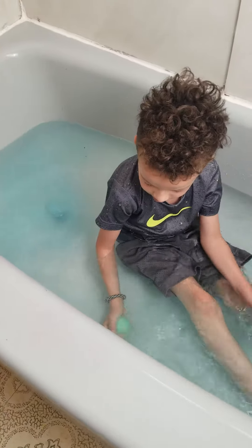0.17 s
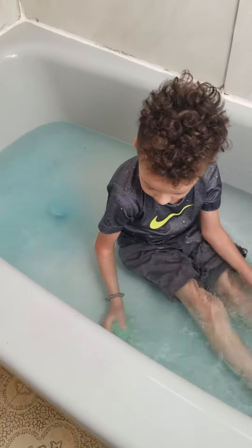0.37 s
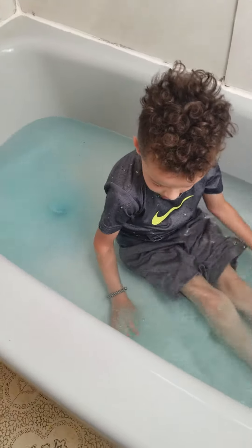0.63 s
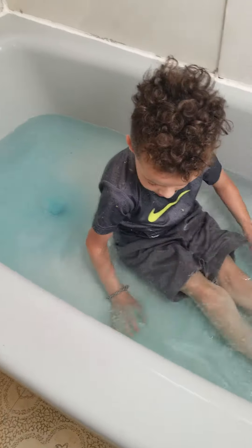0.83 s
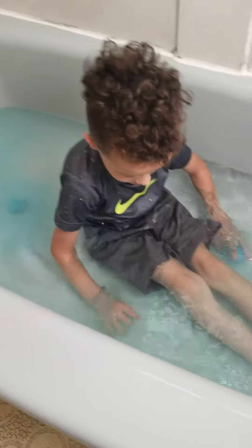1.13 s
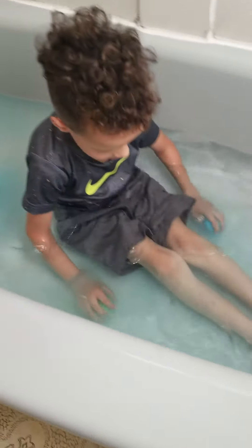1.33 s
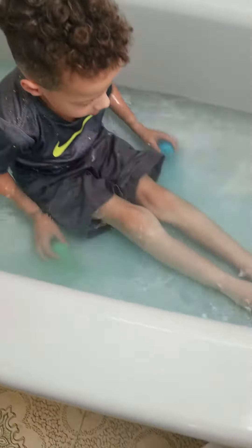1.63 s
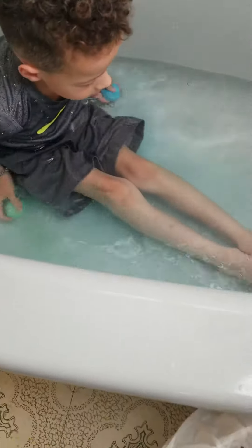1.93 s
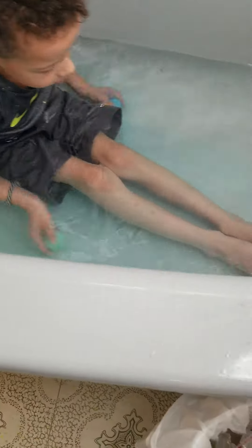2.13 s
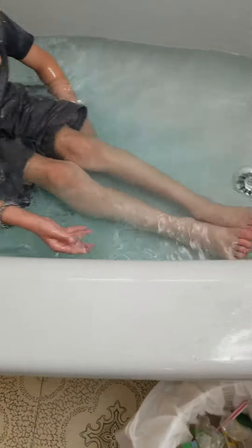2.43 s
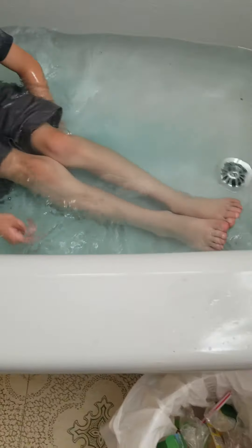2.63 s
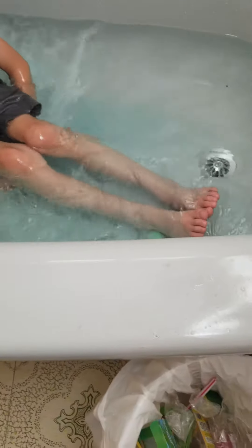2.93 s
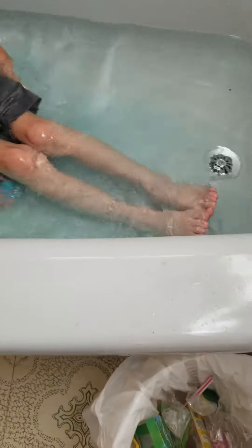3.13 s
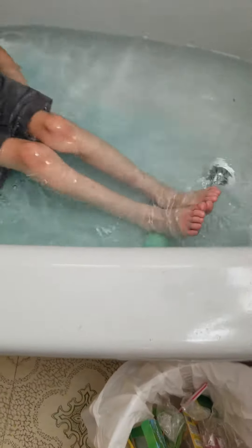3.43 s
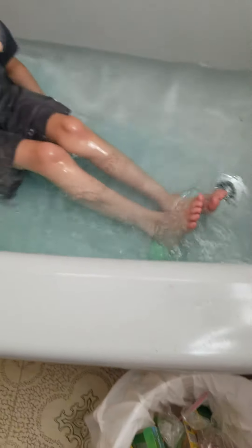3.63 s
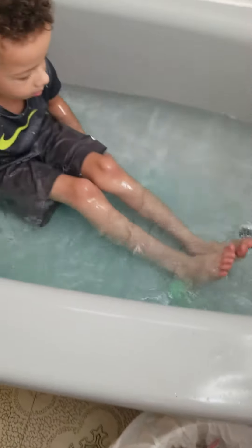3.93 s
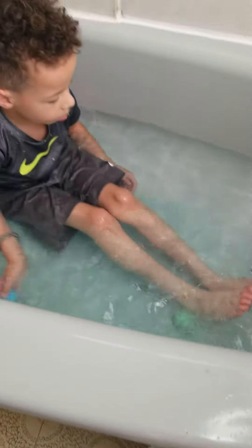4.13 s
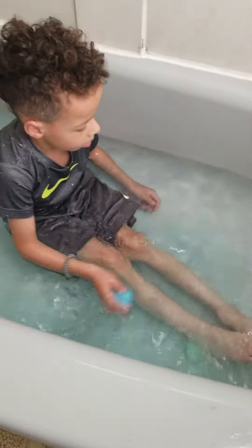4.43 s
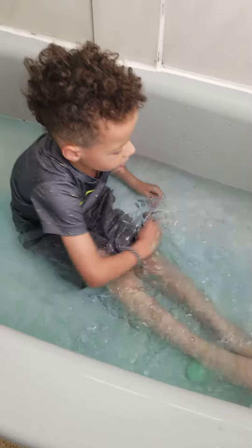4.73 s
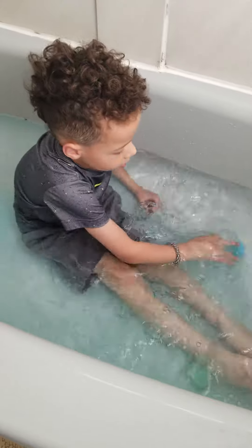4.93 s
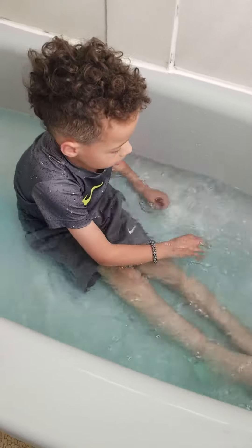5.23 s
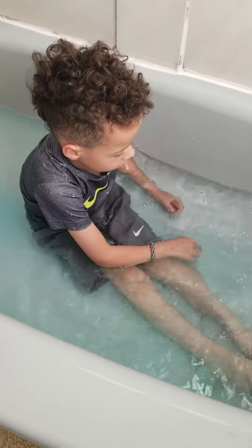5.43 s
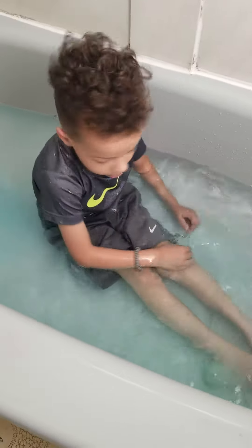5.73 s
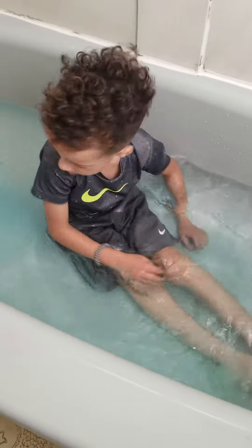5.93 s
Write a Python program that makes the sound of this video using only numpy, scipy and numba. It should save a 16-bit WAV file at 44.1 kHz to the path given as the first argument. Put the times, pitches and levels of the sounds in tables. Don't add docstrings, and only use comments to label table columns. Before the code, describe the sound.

Quiet drips and soft swirls in a shallow bath, two small slap flurries, then a harder burst of splashing that settles into last drops.

```python
import sys
import numpy as np
from scipy import signal
from scipy.fft import rfft, irfft, next_fast_len
from scipy.io import wavfile
from scipy.ndimage import uniform_filter1d
from numba import njit

SR = 44100
rng = np.random.default_rng(int(sys.argv[2]) if len(sys.argv) > 2 else 0)


def materialize(psi):
    bounded = np.clip(np.atleast_2d(psi).T, -1, 1)
    quanta = np.round(bounded * 32767).astype(np.int16)
    wavfile.write(sys.argv[1], SR, quanta)


def ratio_of_db(decibels):
    return 10 ** (np.asarray(decibels, float) / 20)


N = 268657
CENTRED_FROM_S = 5.5


def shaped(x, points):
    hz, db = np.transpose(points)
    size = next_fast_len(x.shape[-1])
    f = np.maximum(np.arange(size // 2 + 1) * SR / size, 1)
    gain = ratio_of_db(np.interp(np.log(f), np.log(hz), db))
    return irfft(rfft(x, size) * gain, size)[..., :x.shape[-1]]


def band(x, hz, width_hz):
    return signal.lfilter(*signal.iirpeak(hz, hz / width_hz, SR), x)


def unit(x):
    return x / np.sqrt(np.mean(x ** 2))


def walk(rate_hz):
    hold = int(SR / rate_hz)
    levels = np.repeat(rng.standard_normal(N // hold + 1), hold)
    return uniform_filter1d(uniform_filter1d(levels, hold), hold)[:N]


def spread(x, pan_db):
    return x * ratio_of_db(np.array([[.5], [-.5]]) * pan_db)


def diffuse(length):
    # (frequency [Hz], likeness [0-1])
    likeness = [(60, 0.82), (130, 0.94), (290, 0.81), (640, 0.94), (1410, 0.0076), (3100, 0.0054),
                (6820, 0.0076), (15000, 0.032)]
    hz, like = np.transpose(likeness)
    mid_db, side_db = (10 * np.log10((1 + sign * like) / 2) for sign in (1, -1))
    mid = shaped(rng.standard_normal(length), np.c_[hz, mid_db])
    side = shaped(rng.standard_normal(length), np.c_[hz, side_db])
    return np.array([mid + side, mid - side])


@njit
def bubbles(start, hz, size, cycles, rise, count, swell=0.):
    out = np.zeros(count)
    for k in range(len(start)):
        n = int(3 * cycles[k] * SR / hz[k])
        fall = 1e-3 ** (1 / n)
        glide = 2 ** (rise[k] * hz[k] / (cycles[k] * SR))
        step = 2 * np.pi * hz[k] / SR * 2 ** (-rise[k] / 4)
        phase, a = 0., size[k]
        swell_rad = 6 * max(swell * cycles[k], 1.)
        for i in range(start[k], min(start[k] + n, count)):
            out[i] += a * np.sin(phase) * min(phase / swell_rad, 1.)
            phase += step
            step = min(step * glide, 3.)
            a *= fall
    return out


def lone_bubbles():
    # (time [s], peak level [dB], pitch [Hz], ring
    bubble_rings = [(0.733, -34.5, 860, 4.5), (0.739, -37, 916, 8), (0.799, -42, 690, 8.2), (0.87, -35.5, 433, 3),
                    (0.872, -33, 944, 5.6), (0.9093, -50, 1030, 9), (0.967, -40.5, 512, 16),
                    (0.983, -40, 553, 5.6), (1.02, -45.5, 596, 11), (0.895, -37.5, 630, 4.1),
                    (1.06, -54, 610, 7.5), (1.028, -46.5, 222, 6.6), (2.239, -41, 243, 11), (2.2628, -47, 870, 14),
                    (2.379, -51, 226, 6.7), (4.267, -35.5, 763, 12), (4.279, -32.5, 744, 23),
                    (4.289, -34.5, 1040, 11), (4.369, -39, 721, 28), (4.603, -34.5, 694, 9),
                    (4.642, -34.5, 482, 3), (4.717, -32.5, 563, 6), (4.746, -36, 458, 10),
                    (4.7477, -25, 1030, 2.7), (4.779, -32, 275, 5.1), (4.819, -27.5, 805, 6),
                    (4.8236, -36, 1080, 4.8), (4.89, -33.5, 352, 8.6), (4.891, -26.5, 860, 9),
                    (4.93, -40, 382, 16), (4.97, -37.5, 520, 6.6), (5.829, -36, 433, 2.3), (2.818, -53.5, 940, 32),
                    (0.868, -35.5, 1530, 6), (0.868, -39.5, 2160, 6.8), (0.33, -60, 1940, 22),
             (0.35, -53, 2600, 18), (0.372, -53, 2500, 22), (0.385, -55, 2210, 12), (0.445, -56, 2100, 41),
             (0.972, -46, 1600, 11), (4.35, -40, 1600, 12), (4.465, -31, 1640, 12), (4.558, -35, 1900, 8.2),
             (5.994, -49, 1365, 10), (2.184, -39.5, 2450, 7.5), (2.228, -32.5, 2310, 7.8),
             (2.311, -32.5, 1239, 29), (2.332, -39, 1920, 9.2), (2.5015, -33.5, 2350, 13),
             (2.585, -36, 2200, 8.7), (2.61, -51, 1830, 13), (4.2008, -46, 1740, 18),
             (0.812, -50, 1230, 22), (0.967, -41.5, 760, 5), (2.279, -44, 2570, 12), (4.76, -33, 1540, 8),
             (4.666, -33, 1500, 10), (2.765, -45.5, 1270, 18), (4.2263, -48, 1790, 4.3),
             (4.4536, -28, 1150, 3.5), (5.149, -47, 2350, 6.2), (4.254, -27.5, 2080, 4.2),
             (4.2878, -30.5, 1633, 35), (4.352, -37, 1347, 29), (4.42, -30, 1110, 7.9),
             (4.5006, -19.5, 1950, 12), (4.659, -30, 1750, 7), (4.699, -26, 1570, 8.3),
             (4.744, -21, 2750, 4), (4.794, -25.5, 1440, 7.7), (4.8465, -26, 2370, 23),
             (4.9408, -24.5, 2240, 8.6), (5.0485, -35.5, 2600, 5.1), (5.555, -39, 2300, 6.2),
             (5.8317, -17.5, 2144, 2.2), (5.928, -42.5, 2010, 18), (6.0612, -42.5, 2600, 16),
                    (0.003, -49, 3930, 34), (3.096, -48, 4370, 25), (0.965, -40, 6370, 9), (2.165, -47, 3230, 11),
             (2.226, -33.5, 4630, 5.4), (2.287, -23.5, 5980, 12), (2.4195, -34.5, 7360, 16),
             (2.467, -33, 3000, 5.7), (2.4931, -31.5, 3800, 10.5), (2.519, -49, 3600, 14),
             (2.55, -44, 3720, 13), (3.47, -47.5, 4180, 15), (4.17, -49, 5600, 8.9), (4.458, -32, 3300, 14),
             (4.477, -25.5, 3870, 10), (4.538, -30, 4100, 17), (2.226, -46, 1330, 3.1),
             (0.867, -51, 3480, 5), (4.243, -37, 3100, 16), (2.18, -49, 6200, 14), (4.575, -35, 5200, 11),
             (5.53, -46, 5250, 15), (4.289, -28.5, 2980, 6.2), (4.354, -41, 2530, 7),
             (4.421, -29.5, 4800, 7.5), (4.5972, -28, 3680, 19), (4.7047, -20.5, 3440, 5.3),
             (4.745, -23, 3950, 14), (4.802, -28.5, 5320, 13), (4.836, -26.5, 3320, 6.4),
             (4.96, -26.5, 4840, 4.5), (5.1377, -32.5, 2780, 6.3), (5.8553, -37, 3120, 17)]
    # (time [s], peak level [dB], pitch [Hz], ring [cycles], glide [octaves])
    sliders = [(0.0024, -44.5, 3330, 24, -0.073), (0.046, -50, 3270, 18, -0.079),
               (0.0953, -45, 3140, 34, -0.19), (0.152, -41.5, 3010, 17, -0.23),
               (0.883, -37, 163.4, 7, 0.21), (1.018, -59, 560, 4.5, .05), (0.964, -46.5, 2360, 17, 0.037),
               (2.248, -37, 705, 4.2, 0.095), (2.338, -40.5, 1277, 21, -0.1),
               (3.044, -59, 3560, 16, -0.034), (3.045, -45, 4430, 13, 0.063),
               (3.056, -45, 3535, 39, -0.059), (3.13, -45, 2750, 7.8, 0.025),
               (4.604, -28, 1670, 19, -0.0092), (4.643, -48, 620, 4, .1), (4.876, -37, 499, 22, 0.15),
               (5.855, -50, 2020, 16, -0.0071), (2.69, -31.5, 1360, 17, -0.092),
               (2.725, -45, 1280, 20, -0.03), (2.702, -40, 1534, 13, 0.1), (3.043, -40, 3720, 17, -0.27),
               (3.124, -50, 2435, 49, -0.091), (4.431, -26, 1563, 18, 0.0055), (4.45, -32, 2920, 9, 0.28),
               (4.463, -20, 1740, 2.7, 0.24), (4.473, -25.5, 2690, 19, 0.35),
               (4.516, -20.5, 2770, 3.1, -0.049), (4.532, -25, 2270, 7.6, 0.16),
               (4.486, -33, 3120, 24, 0.12), (4.554, -27, 2130, 3, 0.2), (4.627, -20, 1730, 9.2, 0.29),
               (4.6365, -19, 1980, 4.2, 0.39), (4.695, -30, 4270, 12, 0.06), (4.709, -32.5, 610, 6.4, 0.27),
               (4.735, -32, 4160, 9.4, 0.038), (4.757, -30, 2530, 7.7, -0.00044),
               (4.772, -34, 1000, 9.3, 0.04), (4.922, -43, 2350, 5.5, 0.02), (5.811, -41, 2890, 24, -.4)]
    rise_octaves = 0.033
    pinch_share = 0.14
    neck_db, neck_octaves, neck_cycles = -15, 0.573, 8.55
    neck_db_per_doubling = 2.5
    pan_1khz_db, pan_db_per_octave, centred_pan_db = 4.5, 1.7, -1.5
    centred_lead = 10

    steady = [(*row, rise_octaves) for row in bubble_rings]
    s, db, hz, cycles, rise = np.transpose([*steady, *sliders]).astype(float)
    centred = s > CENTRED_FROM_S
    pan_db = pan_1khz_db + pan_db_per_octave * np.log2(hz / 1000) + centred_pan_db * centred
    starts = (s * SR).astype(int) - np.outer([0, centred_lead], centred)
    neck_hz = hz * 2 ** (neck_octaves / 4)
    neck_gain = ratio_of_db(neck_db - neck_db_per_doubling * np.log2(cycles / 8))
    same = np.ones(len(s))
    ports = []
    for start, size in zip(starts, spread(ratio_of_db(db - 6.0), pan_db)):
        ring = bubbles(start, hz.copy(), size, np.maximum(cycles, 1.), rise.copy(), N, pinch_share)
        neck = bubbles(start, neck_hz, size * neck_gain, neck_cycles * same, neck_octaves * same,
                       N, pinch_share)
        ports.append(ring + neck)
    return np.array(ports)


def spray():
    # (time [s], heavy drop peak [dB], heavy drop pitch [Hz], mist peak [dB])
    slaps = [(0.7302, -29.5, 2380, -67), (0.798, -32.5, 2020, -61), (0.867, -28, 2170, -64),
             (0.882, -31, 2780, -76), (0.96, -36.5, 2450, -72), (0.9947, -35.5, 1420, -76),
             (2.2258, -28.5, 2240, -52.5), (2.2464, -38, 5150, -64), (2.2865, -28.5, 6100, -55),
             (2.4694, -54, 3220, -53.5), (2.4914, -44, 3830, -61), (2.583, -88, 2080, -59.5),
             (4.241, -27.5, 3260, -61), (4.2868, -23.5, 3100, -52.5), (4.332, -25, 3080, -48),
             (4.356, -17.5, 2520, -51), (4.4231, -43, 4540, -42.5), (4.4732, -17, 3700, -46),
             (4.5198, -23, 2260, -49.5), (4.594, -28, 3620, -40.5), (4.6917, -17, 1860, -62),
             (4.744, -15, 3700, -50), (4.811, -33, 4900, -43), (4.835, -21.5, 2440, -60),
             (4.933, -42, 2220, -53), (4.9613, -24, 4830, -50), (5.1393, -46, 2880, -60),
             (5.548, -58, 5000, -53), (5.554, -48, 4500, -51.5), (5.811, -33, 2800, -57),
             (5.8305, -36, 2580, -46)]
    trickles = [(0.0024, -34, 4800, -56), (0.02, -44.5, 4620, -66), (0.2783, -48.5, 2430, -72),
                (0.3054, -45.5, 2000, -71), (0.325, -46.5, 2310, -77), (0.347, -52, 2340, -70),
                (0.371, -48, 2200, -67), (0.444, -47, 2270, -65), (0.999, -58, 1800, -60.5),
                (0.679, -51.5, 2050, -65), (1.3194, -52, 5100, -84), (1.605, -49, 5200, -75),
                (1.653, -50, 5700, -81), (1.9622, -49, 5200, -72), (1.986, -51.5, 5000, -72),
                (2.18, -43, 5600, -64), (2.204, -60, 2510, -56), (2.423, -56, 2080, -54),
                (2.6917, -45, 2200, -65.5), (3.041, -45.5, 4520, -73), (3.052, -40, 5850, -74),
                (4.002, -71, 2480, -66), (4.026, -68, 4660, -61.5), (4.083, -67, 6300, -59.5),
                (4.105, -70, 6300, -59), (4.205, -42, 1690, -59), (5.2106, -41, 5200, -56),
                (5.2976, -76, 5180, -60), (5.5114, -74, 5750, -67), (5.7456, -45, 1750, -59.5),
                (5.8604, -50, 2570, -62), (5.8885, -59.5, 1840, -68), (5.9997, -51, 1500, -55.5),
                (6.026, -67, 3070, -57.5)]
    # (frequency [Hz], level [dB])
    slap_mist = [(5000, -2), (7000, 6), (10500, 9), (13000, 1), (15800, -16)]
    # (frequency [Hz], level [dB])
    fine_mist = [(5000, -7.5), (8500, 5), (11000, 3.5), (13000, 4.5), (15800, -10)]
    spray_s, mist_rise_s = .015, 0.0035
    slap_octaves, trickle_octaves = 1.99, 0.73
    trickle_ring_cycles = 5.3

    s, heavy_db, heavy_hz, mist_db = np.transpose([*slaps, *trickles])
    trickling = np.arange(len(s)) >= len(slaps)
    octaves = np.where(trickling, trickle_octaves, slap_octaves)
    mist = np.zeros((2, 2, N + SR))
    t = np.arange(SR // 14) / SR
    envelope = np.exp(-t / spray_s) * np.minimum(t / mist_rise_s, 1)
    for k, (start, db) in enumerate(zip((s * SR).astype(int), mist_db)):
        noise, crackle = rng.standard_normal((2, 2, len(t)))
        mist[int(trickling[k]), :, start:start + len(t)] += ratio_of_db(db + 0.5 + 1.9 * crackle) * envelope * noise
    late, size = rng.random((2, 24, len(s)))
    when = s + 2.5 * spray_s * late ** 6
    pitch = np.linspace(-.45, .55, len(late))[:, None]
    hz = np.clip(heavy_hz * 2 ** (octaves * pitch), 300, 9000).ravel()
    loud = ratio_of_db(heavy_db - 14.0 - 4.6 * size - 10.0 * late)
    cycles = 1.85 + 4 * late + trickle_ring_cycles * trickling
    heavy = bubbles((when * SR).astype(int).ravel(), hz, loud.ravel(), cycles.ravel(), 0.043 + 0 * hz, N)
    fine = shaped(mist[0, :, :N], slap_mist) + shaped(mist[1, :, :N], fine_mist)
    return spread(fine, 0.22) + spread(heavy, 3.9)


def cracks():
    # (time [s], peak level [dB], left minus right [dB])
    strikes = [(0.967, -57, 3), (2.229, -40, 11), (2.466, -41, 11), (2.4914, -37.5, -5), (3.04, -48, 6.5),
               (4.242, -40, 4.0), (4.2873, -33, 1.0), (4.421, -32, 9), (4.4714, -25, 2), (4.596, -25, 8.5),
               (4.706, -29.5, 1), (4.744, -32, 6), (4.8383, -25.5, 2.5), (4.9595, -28, 3),
               (5.1377, -41.5, 7), (5.5542, -31.5, 0), (5.831, -28.5, 0)]
    crack_s, crack_db = 0.00074, -5
    out = np.zeros((2, N + SR))
    t = np.arange(SR // 100) / SR
    for s, db, pan_db in strikes:
        start = int(s * SR)
        burst = rng.standard_normal(len(t)) * np.exp(-t / crack_s)
        out[:, start:start + len(t)] += spread(burst * ratio_of_db(db + crack_db), pan_db)
    return shaped(out[:, :N], [(600, -12), (2500, -14), (7000, 6.5), (15800, 0)])


def rubs():
    # (time [s], length [s], slip rate [1/s], level [dB])
    judders = [
        (0.872, 0.033, 165, -50),
        (2.244, 0.044, 122, -47),
        (2.795, 0.048, 310, -48.5),
        (4.751, 0.044, 270, -45),
    ]
    # (frequency [Hz], width [Hz], level [dB])
    shell = [(121, 94, 2), (252, 58, -1), (400, 36, -30), (490, 36, 0), (660, 310, -2.5)]
    slips = np.zeros(N)
    for s, length_s, rate_hz, db in judders:
        gap, size = rng.standard_normal((2, 40))
        t = np.cumsum(1 + 0.051 * gap) / rate_hz
        t = t[t < length_s]
        arch = np.sqrt(np.sin(np.pi * t / length_s))
        slips[((s + t) * SR).astype(int)] = ratio_of_db(db + 36.0 + 3.6 * size[:len(t)]) * arch
    slips = uniform_filter1d(slips, size=46)
    return spread(sum(ratio_of_db(db) * band(slips, hz, width_hz) for hz, width_hz, db in shell), 2.0)


def stirring():
    # (low [Hz], high [Hz], rate [grains/s], ring [cycles], size spread [dB], gain [dB])
    swarms = [
        (193.6, 800, 250, 3.06, 4, -7.5),
        (761, 2975, 500, 7.9, 5.5, -11),
        (3680, 9260, 690, 7.2, 24, -17.5),
        (7360, 12400, 7500, 1.12, -0.5, -8.5),
    ]
    calm_levels_db = [-65, -71, -78, -72]
    out = 0
    for (low_hz, high_hz, rate, cycles, spread_db, gain_db), calm_db in zip(swarms, calm_levels_db):
        when, pitch, size, life = rng.random((50000, 4))[:int(rate * N / SR)].T
        hz = low_hz * (high_hz / low_hz) ** pitch
        loud = ratio_of_db(-spread_db * np.log(size + 0.13))
        swarm = bubbles((when * N).astype(int), hz, loud, cycles * (.5 + life), 0.23 * life, N)
        out = out + unit(swarm) * ratio_of_db(gain_db) * churn(np.sqrt(low_hz * high_hz), calm_db)
    return spread(out, 6.1)


def churn(hz, calm_db):
    # (crest time [s], length [s], level [dB], commonest pitch [Hz])
    strokes = [(0.0, 0.67, -62, 5800), (0.384, 0.47, -53, 2850), (0.482, 0.45, -60.5, 330),
               (0.597, 0.7, -66.5, 6900), (0.945, 0.12, -43, 710), (0.983, 0.019, -48.5, 453),
               (1.332, 0.085, -50.5, 610), (1.545, 0.45, -64, 8100), (2.333, 0.048, -40.5, 2220),
               (2.43, 0.022, -43, 724), (2.473, 0.024, -35, 5560), (2.74, 0.084, -54.5, 885),
               (2.856, 0.074, -52.5, 350), (3.105, 0.12, -61.5, 8500), (3.244, 0.24, -57.5, 557),
               (4.257, 0.074, -38.5, 4360), (4.434, 0.089, -33.5, 2180), (4.477, 0.098, -33.5, 5500),
               (4.646, 0.25, -33, 2400), (4.743, 0.14, -29, 2230), (4.85, 0.23, -44, 614),
               (4.96, 0.039, -36, 1200), (5.11, 0.33, -53, 7440), (5.166, 0.12, -65, 395),
               (5.446, 1, -58.5, 8600), (6.082, 0.57, -51, 610)]
    swell_db, ebb_db = 18.5, 12.5
    larger_db_per_octave, smaller_db_per_octave = 14, 10.5
    t = np.arange(0, N, 64) / SR
    s, length_s, db, common_hz = np.transpose(strokes)[..., None]
    past = (t - s) / length_s
    db = db - np.where(past < 0, -swell_db * past, ebb_db * past)
    off = np.log2(hz / common_hz)
    db = db - np.where(off < 0, -larger_db_per_octave * off, smaller_db_per_octave * off)
    level = np.sqrt(ratio_of_db(calm_db) ** 2 + np.sum(ratio_of_db(db) ** 2, axis=0))
    return np.interp(np.arange(N) / SR, t, level)


def evened(ring):
    spectrum = rfft(ring, 2 * ring.shape[1])
    narrow, wide = (uniform_filter1d(np.abs(spectrum) ** 2, size) for size in (81, 1201))
    return irfft(spectrum * np.sqrt(wide / narrow))[:, :ring.shape[1]]


def bathroom(x, direct_db):
    # (delay [s], left [dB], right [dB])
    tub_echoes = [
        (.0027, -9.5, -47),
        (.0047, -12.5, -12),
        (0.0098, -23, -1.5),
    ]
    # (frequency [Hz], t60 [s], tail level [dB])
    tiles = [(147, 0.76, 3.5), (520, 0.47, 9.5), (1500, 0.29, 7.5), (4910, 0.23, 11.5), (11400, 0.36, 0.5)]
    right_lag = 14
    t = np.arange(SR * 3 // 5) / SR
    noise = diffuse(len(t)) * np.minimum(t / 0.004, 1)
    echo = np.zeros((2, len(t)))
    echo[:, 0] = 1
    for s, *db in tub_echoes:
        echo[:, int(s * SR)] += ratio_of_db(np.array(db))
    echo *= ratio_of_db(direct_db)
    ring = 0
    for k, (hz, t60_s, db) in enumerate(tiles):
        tent = [(row[0], -20 * (j != k)) for j, row in enumerate(tiles)]
        tail = shaped(noise, tent) * 1e-3 ** (t / t60_s)
        ring = ring + ratio_of_db(db) * tail * np.sqrt(np.log(1e6) / (t60_s * SR))
    echo += evened(ring)
    wet = signal.fftconvolve(x, echo, axes=1)[:, :N]
    return np.array([wet[0], np.roll(wet[1], right_lag)])


def house():
    # (frequency [Hz], density [dB/Hz])
    air_colour = [(20, -17), (35, -4), (54, -6.5), (124, 2.5), (216, -11), (400, -30.5), (1150, -38),
                  (1550, -27), (2900, -86), (5500, -41.5), (12000, -33.5), (16000, -41)]
    # (frequency [Hz], width [Hz], level [dB])
    hum = [(121.9, 5.6, -62.5), (155.4, 7.1, -64), (65.6, 6.1, -65.5), (207.3, 2.6, -67.5), (620, 21, -79),
           (751, 8.9, -88), (1604, 16, -84)]
    air_db = -54
    rumble = diffuse(N)
    out = unit(shaped(rumble, air_colour)) * ratio_of_db(air_db - 2.0 + walk(3.47))
    for hz, width_hz, db in hum:
        out = out + ratio_of_db(db + 2 * walk(5.4)) * unit(band(rumble[:, ::-1], hz, width_hz))
    return out


def scene():
    far_wet_db, spray_wet_db, near_wet_db = -2.0, -0.7, -3
    lone = lone_bubbles() + rubs()
    thrown = spray() + cracks()
    near = np.arange(N) > CENTRED_FROM_S * SR
    far = bathroom(lone * ~near * ratio_of_db(far_wet_db), direct_db=6.5)
    swirl = bathroom(stirring(), direct_db=-4.0)
    close = bathroom((lone + thrown) * near * ratio_of_db(near_wet_db), direct_db=6.0)
    splash = bathroom(thrown * ~near * ratio_of_db(spray_wet_db), direct_db=3.0)
    return far + swirl + house() + close + splash


def band_limit(x):
    return signal.sosfilt(signal.butter(12, 16660, fs=SR, output="sos"), x)


def record(dry):
    # (frequency [Hz], level [dB])
    port_response = [(100, 0), (5800, 3), (6900, -4), (7700, -10.5), (8600, -14.5), (9800, -10.5),
                     (11500, -3.5), (15800, 5.5), (15950, -56), (16600, -50)]
    return band_limit(shaped(dry, port_response))


dry = scene()
out = record(dry)
materialize(out)
```